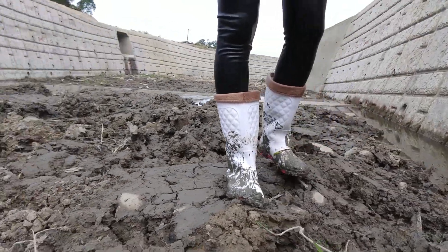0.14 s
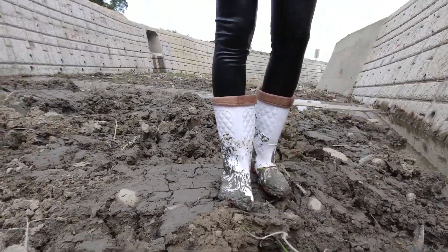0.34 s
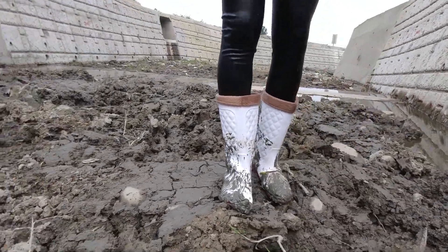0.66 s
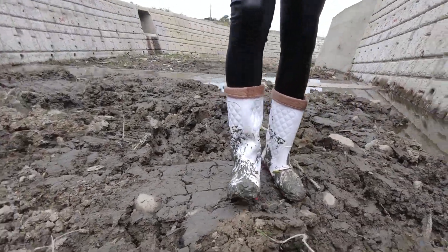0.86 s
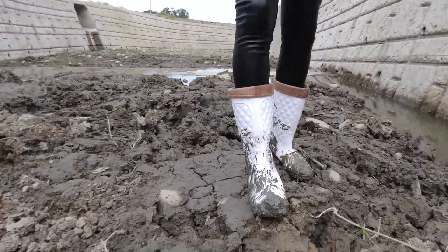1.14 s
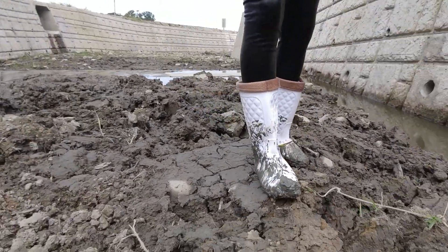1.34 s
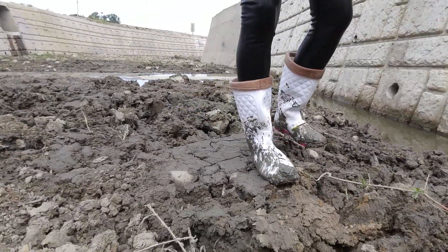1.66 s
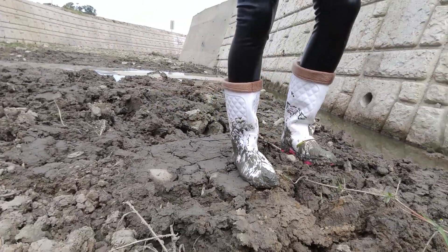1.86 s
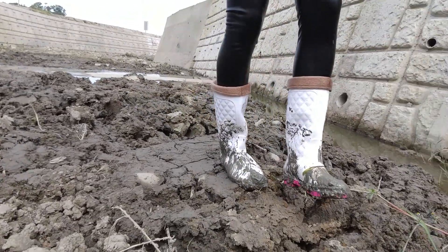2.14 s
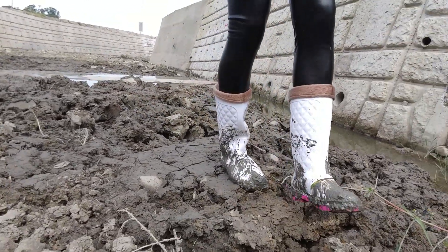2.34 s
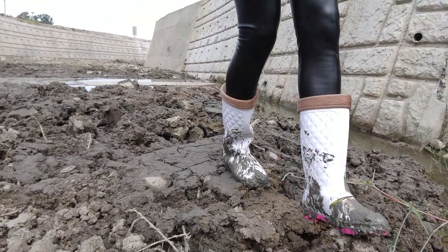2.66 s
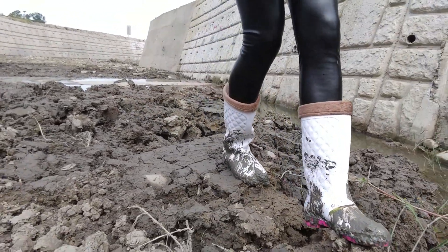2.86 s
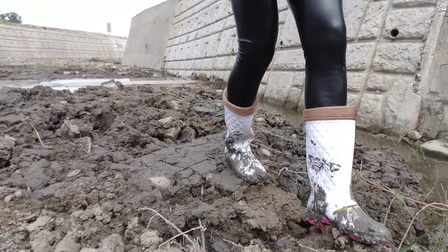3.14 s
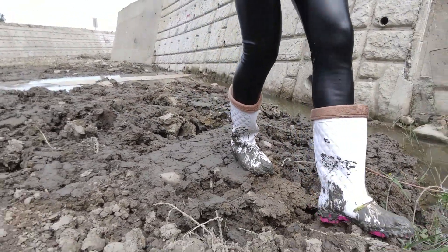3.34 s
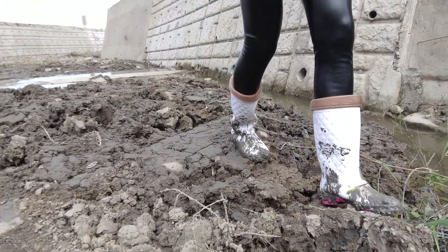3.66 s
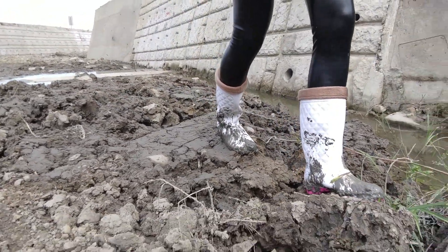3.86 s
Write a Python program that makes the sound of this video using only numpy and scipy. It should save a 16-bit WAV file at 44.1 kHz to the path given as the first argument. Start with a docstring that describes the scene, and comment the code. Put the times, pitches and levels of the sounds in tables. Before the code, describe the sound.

Wet mud gurgles, smacks and crackles quietly under slow boots while wind buffets the microphone

```python
"""Boots in wet mud, wind on the ports

Slow boot steps at the foot of a concrete channel wall, heard by two spaced microphone ports. Water gurgles
in rising sines, mud smacks and crackles in ringing noise and chirps, one boot thuds as a decaying sine.
The wall answers with a short noise tail. Wind is shaped noise plus single slaps, separate on each port.
Far hiss, a low murmur and a faint hum, all filtered noise, lie underneath."""
import sys
import numpy as np
from scipy import signal
from scipy.fft import rfft, irfft, next_fast_len
from scipy.io import wavfile
from scipy.ndimage import uniform_filter1d, map_coordinates

SR = 44100
rng = np.random.default_rng(int(sys.argv[2]) if len(sys.argv) > 2 else 0)


def transcribe(u):
    """Save the signal u as a 16-bit wav file named by the first command-line argument.

    u: samples, shape (n,) or (channels, n), limited to [-1, 1]; the rate is SR.
    q: integer samples, one column per channel.
    """
    v = np.clip(np.atleast_2d(u).T, -1, 1)
    q = np.round(v * 32767).astype(np.int16)
    wavfile.write(sys.argv[1], SR, q)


N = 176400


def amp(db):
    """Decibels to amplitude."""
    return 10 ** (np.asarray(db) / 20)


def unit(x):
    """Scale each channel to rms 1."""
    return x / np.sqrt(np.mean(x ** 2, axis=-1, keepdims=True) + 1e-20)


def along(points, hz):
    """Interpolate (Hz, value) points on a log frequency axis."""
    f, v = np.transpose(points)
    return np.interp(np.log(hz + 1), np.log(f + 1), v)


def curves(rows):
    """One value per sample for each column after the time."""
    s, *cols = np.transpose(rows)
    return [np.interp(np.arange(N) / SR, s, c) for c in cols]


def wobble(rate_hz):
    """Two smooth random curves, rate_hz knots a second."""
    position = np.arange(N) * rate_hz / SR
    return np.array([map_coordinates(knots, [position]) for knots in rng.standard_normal((2, 400))])


def filtered(x, response):
    """x times a complex response of frequency."""
    m = next_fast_len(x.shape[-1] + 8192)
    return irfft(rfft(x, m) * response(np.fft.rfftfreq(m, 1 / SR)), m)[..., :x.shape[-1]]


def rush(spectrum):
    """Unrelated noise for each port, rms 1, cut 60 dB below the first spectrum point."""
    def response(hz):
        return amp(along(spectrum, hz) - 60 * (hz < spectrum[0][0]))
    return unit(filtered(rng.standard_normal((2, N)), response))


def add(out, s, sound, pan_db=0):
    """Mix a short sound in at time s, left over right by pan_db."""
    part = out[:, round(s * SR):][:, :len(sound)]
    part += amp([[pan_db / 2], [-pan_db / 2]]) * sound[:part.shape[1]]


# Hiss spectrum before the port balance. Each row: frequency in Hz, relative density in dB per Hz.
AIR_SPECTRUM = [(150, -25), (250, -4), (392, -2), (554, -5.5), (769, -6), (1120, -10), (2130, -12.5),
                (3840, -14), (5330, -16.5), (8350, -18), (12400, -12.5), (15600, -19)]
# Hiss balance between ports. Each row: frequency in Hz, left over right in dB.
AIR_BALANCE = [(60, 37), (180, 0), (550, -1), (1650, 0.5), (4970, 0), (15000, 2.5)]
AIR_DB, AIR_PATCHY_DB = -66, 2


def air_hiss():
    """Outdoor hiss: noise whose level varies in random patches of time and frequency."""
    noise = filtered(rush(AIR_SPECTRUM), lambda hz: amp(along(AIR_BALANCE, hz) * [[.5], [-.5]]))
    z = signal.stft(noise, nperseg=512)[2]
    field = uniform_filter1d(rng.standard_normal(z.shape[1:]), 16, 0)
    field = uniform_filter1d(field, 6, 1)
    patchy = z * amp(AIR_PATCHY_DB * field / field.std())
    return amp(AIR_DB) * signal.istft(patchy, nperseg=512)[1][:, :N]


# Hum level. Each row: time in seconds, rms level in dB.
HUM_LEVEL = [(0, -62.5), (2.3, -60.5), (2.8, -67.5), (4, -58.5)]
HUM_HZ, HUM_WIDTH_HZ = 124.1, 14.3


def hum():
    """Narrow band of noise that wavers like an unsteady tone, the same on both ports."""
    band = filtered(rng.standard_normal(N), lambda hz: np.exp(-((hz - HUM_HZ) / HUM_WIDTH_HZ) ** 2))
    return amp(curves(HUM_LEVEL)[0]) * unit(band)


# Far low murmur of the outdoors. Each row: frequency in Hz, relative density in dB per Hz.
FAR_SPECTRUM = [(25, 0), (60, 1), (150, 5.5), (300, -6.5), (500, -31)]
FAR_DB = -67.5


def far_murmur():
    """Steady low noise, unrelated between ports."""
    return amp(FAR_DB) * rush(FAR_SPECTRUM)


# Decay of the wall's answer. Each row: frequency in Hz, t60 in seconds.
WALL_T60 = [(500, 0.12), (4000, 0.091), (12000, 0.011)]
WALL_DB, WALL_DELAY_SAMPLES = -11, 250


def wall(x):
    """Delayed noise tail in which each frequency dies at its own speed."""
    hz, t, z = signal.stft(rng.standard_normal((2, SR // 4)), SR, nperseg=256)
    decay = amp(-60 * t / along(WALL_T60, hz)[:, None])
    tail = signal.istft(z * decay, SR, nperseg=256)[1]
    tail /= np.linalg.norm(tail[0])
    delayed = np.pad(x, ((0, 0), (WALL_DELAY_SAMPLES, 0)))
    return amp(WALL_DB) * signal.fftconvolve(delayed, tail, axes=1)[:, :N]


# Wind on the left port. Each row: time in seconds, strength in dB.
WIND_LEFT = [(0, -26), (0.09, -37), (0.12, -25.5), (0.25, -30.5), (0.28, -39), (0.33, -25.5), (0.52, -31.5),
             (0.56, -37.5), (0.62, -32), (0.87, -39.5), (0.91, -54), (1.04, -38), (1.1, -43), (1.18, -50.5),
             (1.25, -37), (1.42, -38), (1.5, -29.5), (1.64, -37), (1.68, -49), (1.74, -28), (1.79, -38.5),
             (1.84, -52), (2.33, -47.5), (2.38, -38.5), (2.64, -40.5), (2.69, -60), (2.93, -48),
             (3.05, -41.5), (3.15, -50.5), (3.7, -45.5), (3.78, -37.5), (3.88, -48), (4, -44)]
# Wind on the right port. Each row: time in seconds, strength in dB.
WIND_RIGHT = [(0, -51), (0.16, -49), (0.21, -26.5), (0.32, -35.5), (0.36, -42), (0.52, -42), (0.6, -53),
              (0.76, -39), (0.9, -50), (1.03, -54), (1.08, -36), (1.18, -46), (1.33, -32.5), (1.48, -41),
              (1.6, -49), (2.9, -54.5), (3.4, -48), (3.44, -38), (3.62, -40.5), (3.68, -43), (3.92, -42),
              (4, -50.5)]
# Turbulent rumble. Each row: frequency in Hz, relative density in dB per Hz.
RUMBLE_SPECTRUM = [(12, -39), (20, 5), (43, 4), (71, 3), (122, -13.5), (280, -30), (360, -53), (620, -120)]
# Higher flutter of strong gusts. Each row: frequency in Hz, relative density in dB per Hz.
FLUTTER_SPECTRUM = [(70, -55), (110, 14.5), (160, 5.5), (230, -10.5), (320, -16.5), (450, -27),
                    (900, -68.5)]
LUMPS_DB, LUMPS_PER_S = 1.5, 27
FLUTTER_DB, FLUTTER_REF_DB = -54.5, -36.5  # flutter level where the wind is at the reference
FLUTTER_DB_PER_DB = 1.76


def gusts():
    """Lumpy turbulence on each port; flutter grows faster than the gust that drives it."""
    port_db = np.array(curves(WIND_LEFT) + curves(WIND_RIGHT))
    lumps_db = LUMPS_DB * wobble(LUMPS_PER_S)
    rumble = amp(port_db) * unit(amp(lumps_db) * rush(RUMBLE_SPECTRUM))
    flutter_db = FLUTTER_DB + FLUTTER_DB_PER_DB * (port_db - FLUTTER_REF_DB + lumps_db)
    return rumble + amp(flutter_db) * rush(FLUTTER_SPECTRUM)


# Single eddies that slap one port.
# Each row: centre in seconds, level in dB before EDDY_TRIM_DB, pitch in Hz, port (1 left, -1 right).
EDDIES = [(0.125, -19, 85.5, 1.0), (0.162, -16, 84, 1.0), (0.229, -12.5, 82, 1.0), (0.246, -18, 97, -1.0),
          (0.307, -17.5, 100, -1.0), (0.337, -13, 84, 1.0), (0.389, -17, 105, 1.0), (0.458, -19, 87, 1.0),
          (0.614, -23, 67.4, 1.0), (0.741, -28, 63, 1.0), (0.863, -29.5, 57.6, 1.0), (1.043, -31, 85, 1.0),
          (1.077, -26, 82.6, 1.0), (1.092, -27, 47.5, -1.0), (1.259, -25.5, 89, 1.0),
          (1.28, -28, 52.3, -1.0), (1.333, -30, 61, 1.0), (1.344, -27, 80, -1.0), (1.447, -30, 71.7, 1.0),
          (1.455, -35, 93, -1.0), (1.499, -24, 94, 1.0), (1.73, -19, 69.6, 1.0), (2.471, -30, 68.5, 1.0),
          (2.513, -32.5, 75.4, 1.0), (3.456, -26.5, 55.5, -1.0), (3.552, -23.5, 56.5, -1.0),
          (3.678, -26.5, 54.4, -1.0), (3.731, -30, 65.0, -1.0), (3.775, -31, 92, 1.0),
          (3.785, -28.5, 71, -1.0), (3.89, -30, 77, -1.0)]
EDDY_TRIM_DB, EDDY_HALF_CYCLES, EDDY_OVERTONE = -1.5, 0.55, 0.17
EDDY_SCATTER_RAD = 0.7  # departure from a plain suction


def eddy_slaps():
    """Suction pulses under a Gaussian, about one cycle long, with an octave overtone."""
    out = np.zeros((2, N))
    t = np.arange(-SR // 20, SR // 20) / SR
    for s, db, hz, port in EDDIES:
        turn = 2 * np.pi * hz * t + rng.normal(0, EDDY_SCATTER_RAD)
        envelope = np.exp(-(t * hz / EDDY_HALF_CYCLES) ** 2)
        slap = envelope * (np.cos(turn) + EDDY_OVERTONE * np.cos(2 * turn))
        out[int(port < 0), round(s * SR) - SR // 20:][:len(t)] -= amp(db + EDDY_TRIM_DB) * slap
    return out


BUBBLE_ATTACK, CLIMB_POWER = 0.15, 1.39  # attack as share of the length; power of time in the climb
BUBBLE_ROUGH = .09  # rms share of random pitch error, redrawn every 44 samples


def bubble(hz, length_s, octaves):
    """A cavity in the mud closes: a tone that climbs ever faster and fades."""
    u = np.arange(int(length_s * SR) + 8) / SR / length_s
    envelope = (1 - np.exp(-u / BUBBLE_ATTACK)) * np.exp(-2 * u ** 3)
    wander = 1 + BUBBLE_ROUGH * np.repeat(rng.standard_normal(len(u) // 44 + 1), 44)[:len(u)]
    pitch_hz = wander * hz * 2 ** (octaves * u ** CLIMB_POWER)
    return envelope * np.sin(2 * np.pi * np.cumsum(pitch_hz) / SR)


def scatter(per_s, hz, spread, db, cycles):
    """Many small random bubbles, up to 15.7 dB below db, lognormal in pitch."""
    out, rows = np.zeros((2, N)), rng.random((1200, 3))
    pitches = np.clip(hz * np.exp(spread * rng.standard_normal(1200)), 520, 14000)
    starts = np.cumsum(-np.log(rows[:, 0])) / per_s
    for s, pitch, size, climb in zip(starts, pitches, rows[:, 1], rows[:, 2]):
        if s < N / SR:
            add(out, s, amp(db - 15.7 * size) * bubble(pitch, cycles / pitch, 0.49 * climb))
    return out


def gurgle():
    """Background of small low bubbles."""
    return scatter(per_s=70, hz=972, spread=0.408, db=-64.5, cycles=9.1)


def crackle():
    """Dense tiny high bubbles, heard as crackle."""
    return scatter(per_s=200, hz=6480, spread=0.53, db=-62, cycles=8.6)


SMACK_WIDTH, SNAP_WIDTH = 0.25, 0.54  # bandwidth over centre frequency
TICKS_PER_S, SMACK_HISS = 500, 0.09
SNAP_AT_10KHZ, SNAP_DECAY_S = 0.9, 0.0014  # snap peak over body peak, in proportion to pitch


def smack(hz, length_s):
    """A film of mud tears: a wide snap over uneven ticks and hiss ringing in one cavity, body peak 1."""
    def cavity(width):
        def response(f):
            loss = 1j * f * hz * width
            return (loss / (hz * hz - f * f + loss)) ** 2
        return response

    t = np.arange(SR // 16) / SR
    ticks = (rng.random(len(t)) < TICKS_PER_S / SR) + (t == 0)  # one tick always at the start
    rough = ticks + SMACK_HISS * rng.standard_normal(len(t))
    body = filtered(rough * np.exp(-(t / length_s) ** 2), cavity(SMACK_WIDTH))
    snap = filtered(rng.standard_normal(len(t)) * np.exp(-t / SNAP_DECAY_S), cavity(SNAP_WIDTH))
    return body / abs(body).max() + SNAP_AT_10KHZ * hz / 10000 * snap / abs(snap).max()


SEEP_PER_S, SEEP_HZ, SEEP_SPREAD, SEEP_TOP_DB, SEEP_RANGE_DB = 20, 3600, .4, -65, 21.0


def seep():
    """Small smacks at random times, pitches and levels."""
    out = np.zeros((2, N))
    for when, size, pitch in rng.random((round(SEEP_PER_S * N / SR), 3)):
        hz = SEEP_HZ * np.exp(SEEP_SPREAD * (2 * pitch - 1))
        add(out, when * N / SR, amp(SEEP_TOP_DB - SEEP_RANGE_DB * size) * smack(hz, length_s=0.0044))
    return out


# Bubbles that stand out.
# Each row: start in seconds, level in dB before BUBBLE_TRIM_DB, starting pitch in Hz, length in seconds,
# climb in octaves.
BUBBLES = [(0.048, -56.5, 698, 0.042, 0.64), (0.164, -59, 767, 0.022, 0.94),
           (0.169, -56.5, 1520, 0.011, 0.3), (0.231, -50, 613, 0.013, 1), (0.261, -59, 1460, 0.017, 0.49),
           (0.369, -58, 735, 0.029, 0.216), (0.731, -61, 1190, 0.0086, 0.79),
           (0.826, -55.5, 502, 0.041, 1.2), (0.958, -58, 672, 0.041, 1.15), (1.006, -60, 1690, 0.018, 0.13),
           (1.163, -60, 630, 0.016, 0.13), (1.185, -58.5, 1410, 0.011, 0.93),
           (1.267, -62.5, 625, 0.074, 0.074), (1.3, -53.5, 1427, 0.018, 0.8),
           (1.407, -57.5, 670, 0.024, 0.25), (1.511, -55, 880, 0.03, 0.88), (1.628, -60.5, 717, 0.04, 0.72),
           (1.688, -55, 797, 0.025, 0.33), (1.725, -58, 990, 0.026, 0.55), (1.794, -52, 818, 0.019, 0.234),
           (1.887, -54, 1560, 0.02, 0.8), (1.978, -60.5, 721, 0.034, 0.25), (2.043, -55, 880, 0.021, 0.23),
           (2.114, -56, 713, 0.021, 0.091), (2.16, -63, 710, 0.023, .05), (2.197, -57, 730, 0.018, 0.32),
           (2.247, -59, 743, 0.018, 0.35), (2.331, -53, 1982, 0.012, 0.054),
           (2.35, -57.5, 608, 0.045, 0.44), (2.397, -60, 694, 0.038, 0.68), (2.457, -58.5, 707, 0.029, .05),
           (2.532, -47, 834, 0.024, 0.29), (2.602, -56.5, 698, 0.0226, 0.36),
           (2.684, -55.5, 556, 0.051, 1.2), (2.742, -59.5, 1754, 0.024, 0.32),
           (2.762, -53.5, 680, 0.026, 0.6), (2.869, -55.5, 516, 0.023, 0.82), (2.957, -62, 642, 0.02, 0.46),
           (3.01, -57, 775, 0.015, 0.056), (3.084, -63, 610, 0.028, 0.42), (3.162, -62, 770, 0.022, 0.48),
           (3.225, -54.5, 656, 0.052, 0.54), (3.26, -55.5, 1050, 0.031, 1.1),
           (3.305, -56.5, 796, 0.026, 0.32), (3.591, -57.5, 615, 0.048, 1.7),
           (3.688, -58.5, 608, 0.068, 0.067), (3.719, -66, 595, 0.058, 0.78),
           (3.831, -53.5, 610, 0.014, 1.05)]
BUBBLE_TRIM_DB = -4.5


def bubbles():
    """Water gurgles as closing cavities, one rising tone each."""
    out = np.zeros((2, N))
    for s, db, hz, length_s, octaves in BUBBLES:
        add(out, s, amp(db + BUBBLE_TRIM_DB) * bubble(hz, length_s, octaves))
    return out


# Wet smacks. Each row: start in seconds, body peak in dB, centre in Hz, length in seconds.
SMACKS = [(0.184, -56, 4950, 0.04), (0.235, -66, 2800, 0.012), (0.4892, -52.5, 3900, 0.0042),
          (0.4945, -54, 4130, 0.007), (0.602, -62, 4240, 0.004), (0.6693, -50, 3450, 0.003),
          (0.6735, -56, 3650, 0.0043), (0.784, -61.5, 4120, 0.011), (0.815, -60, 4300, 0.019),
          (0.836, -57, 12600, 0.013), (0.8819, -58, 5800, 0.016), (0.974, -63, 4050, 0.014),
          (1.0673, -52.5, 4100, 0.0099), (1.2775, -53, 8300, 0.012), (1.725, -54, 11700, 0.0154),
          (1.8743, -54.5, 11400, 0.018), (1.908, -52, 3070, 0.013), (2.093, -56, 11100, 0.012),
          (2.1755, -60, 4650, 0.023), (2.228, -62, 4400, 0.027), (2.4339, -55, 12000, 0.0135),
          (2.709, -50, 1840, 0.014), (2.723, -71, 4080, 0.006), (2.818, -56, 5400, 0.0096),
          (2.912, -55, 11500, 0.017), (3.002, -63, 4020, 0.0067), (3.0604, -60, 4400, 0.009),
          (3.138, -65, 4030, 0.009), (3.27, -57, 4600, 0.0091), (3.2745, -44.5, 8770, 0.0052),
          (3.297, -62, 3630, 0.0067), (3.382, -58, 10400, 0.033), (3.51, -64, 11700, 0.053),
          (3.3906, -62, 3800, 0.015), (3.432, -55.5, 10470, 0.0053), (3.4476, -53.5, 3800, 0.025),
          (3.4485, -55.5, 11400, 0.005), (3.569, -55, 9100, 0.0068), (3.6366, -58, 3950, 0.0084),
          (3.6356, -60, 10500, 0.006), (3.7413, -61, 4220, 0.008), (3.757, -64, 3730, 0.016),
          (3.774, -53, 4100, 0.006), (3.791, -51, 6100, 0.005), (3.786, -56, 10500, 0.005)]
# Side of the smacks. Each row: time in seconds, left over right in dB for a smack at 10 kHz.
SMACK_SIDE = [(0, -5), (3.2, 3), (3.4, 14), (3.6, 9), (3.8, -1), (4, 4)]


def smacks():
    """Torn mud films, panned by the square of their pitch."""
    out = np.zeros((2, N))
    for s, db, hz, length_s in SMACKS:
        pan_db = np.interp(s, *np.transpose(SMACK_SIDE)) * (hz / 10000) ** 2
        add(out, s, amp(db) * smack(hz, length_s), pan_db)
    return out


# Boot thuds. Each row: start in seconds, level in dB, pitch in Hz, t60 in seconds.
THUDS = [(2.753, -39.5, 250, 0.032)]
THUD_ATTACK_S = 0.00066


def boot_thuds():
    """A boot thuds: a low sine with a fast attack and exponential decay."""
    out, t = np.zeros((2, N)), np.arange(SR // 8) / SR
    for s, db, hz, t60_s in THUDS:
        envelope = amp(db - 60 * t / t60_s) * (1 - np.exp(-t / THUD_ATTACK_S))
        add(out, s, envelope * np.sin(2 * np.pi * hz * t), pan_db=-1)
    return out


def mud():
    """All mud and boot sounds, before port delay and wall."""
    return gurgle() + crackle() + seep() + bubbles() + smacks() + boot_thuds()


# Delay between ports. Each row: time in seconds, lead of the left port in milliseconds.
LEAD = [(0, 0), (1, 0.02), (2.2, .23), (4, 0.27)]


def ports(x):
    """The right port hears the mud ever later than the left, so the image drifts left."""
    lead_ms, = curves(LEAD)
    late = map_coordinates(x[1], [np.arange(N) - lead_ms * SR / 1000], order=5)
    return np.array([x[0], late])


def scene():
    """Outdoor bed and wind, with the mud heard directly and off the wall."""
    outdoors = air_hiss() + hum() + far_murmur()
    wind = gusts() + eddy_slaps()
    steps = mud()
    return outdoors + wind + wall(steps) + ports(steps)


MIC_LOW_HZ, TOP_HZ = 26.4, 15750


def record(dry):
    """The microphone rolls off the deepest bass; nothing passes above the band limit."""
    return filtered(dry, lambda hz: (hz < TOP_HZ) * (1j * hz / (MIC_LOW_HZ + 1j * hz)) ** 2)


dry = scene()
out = record(dry)
transcribe(out)
```